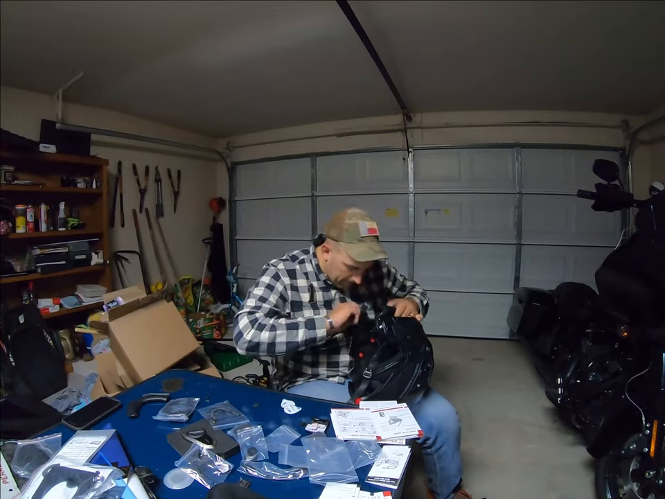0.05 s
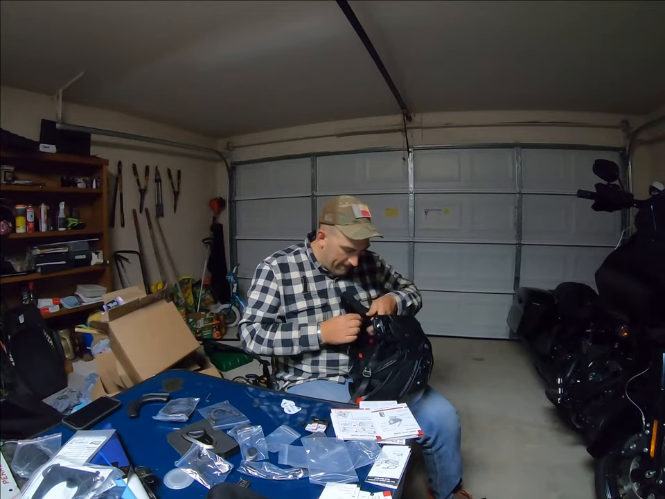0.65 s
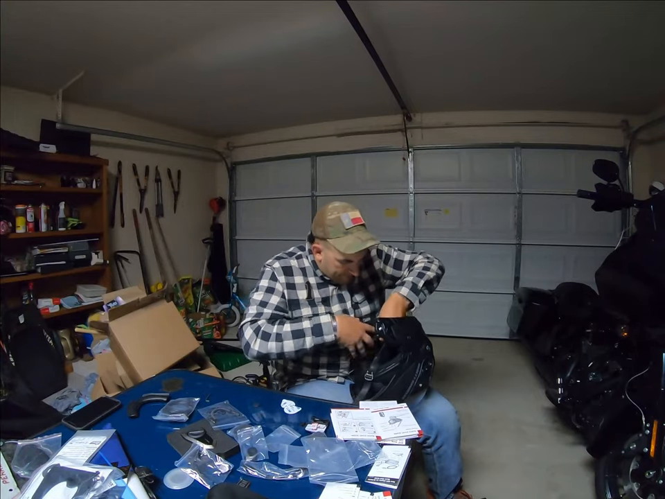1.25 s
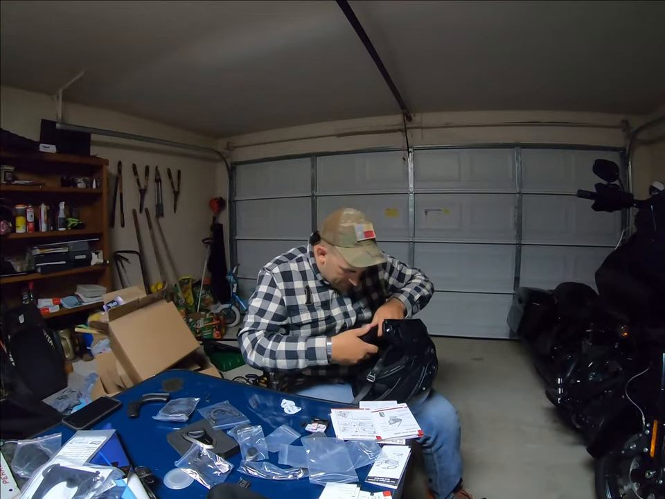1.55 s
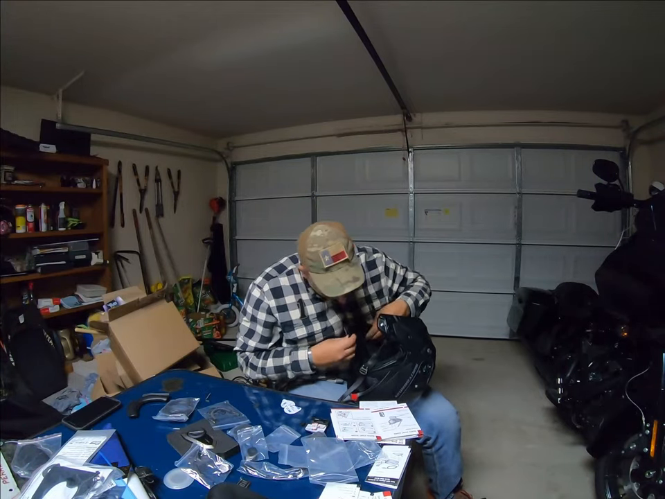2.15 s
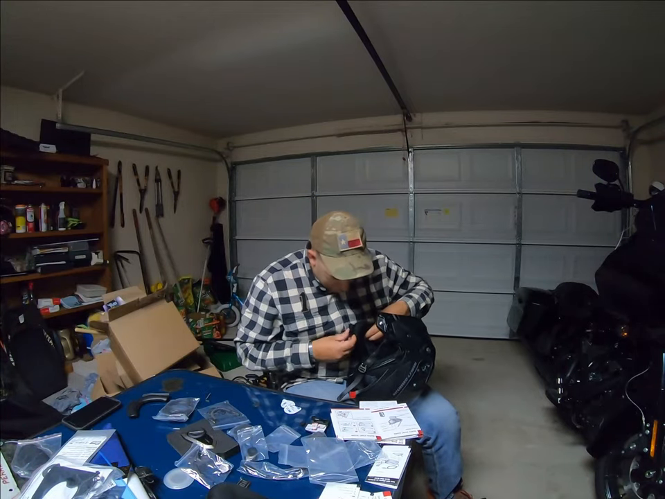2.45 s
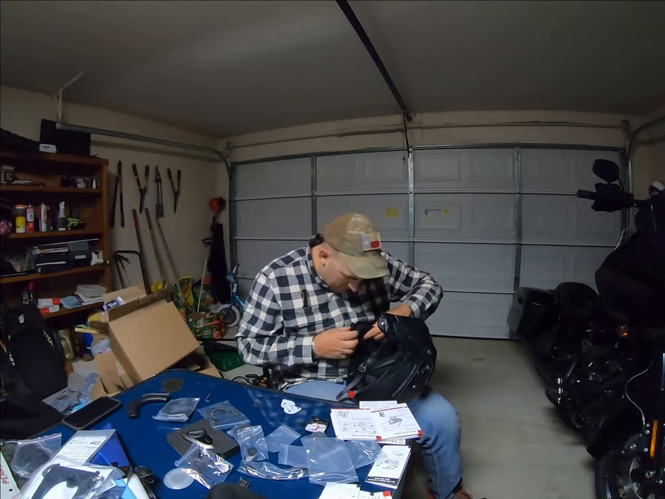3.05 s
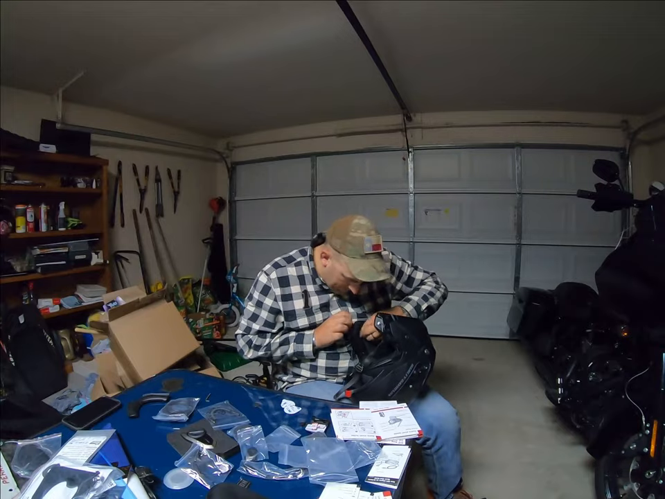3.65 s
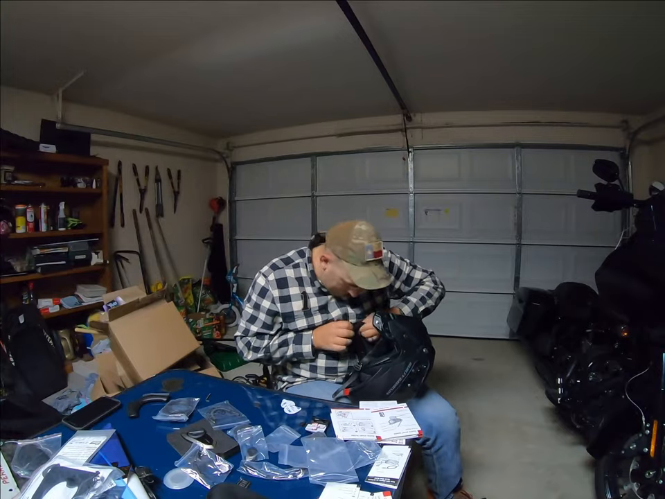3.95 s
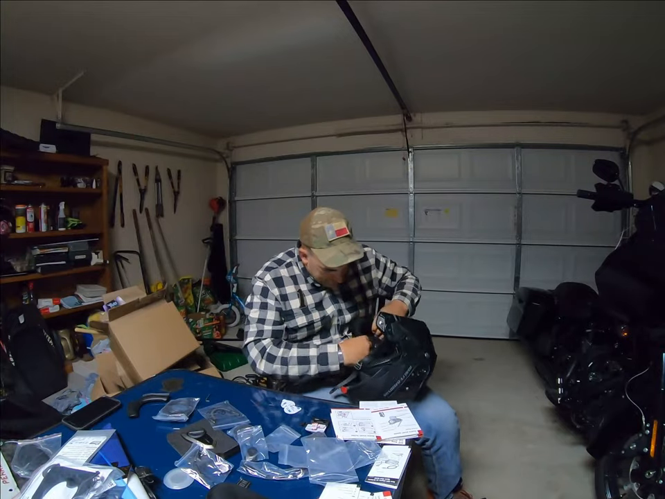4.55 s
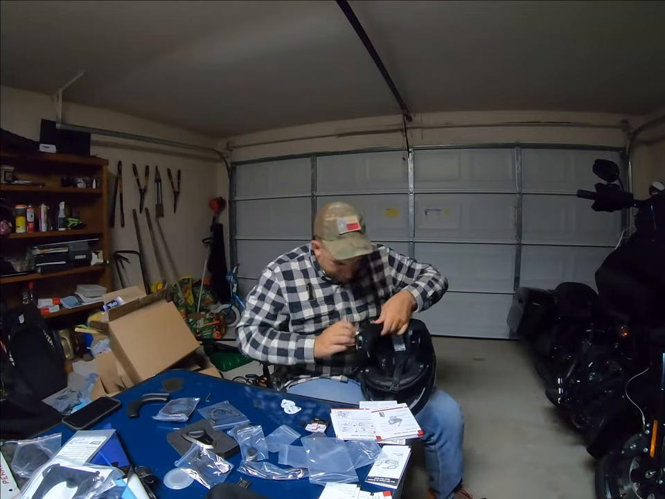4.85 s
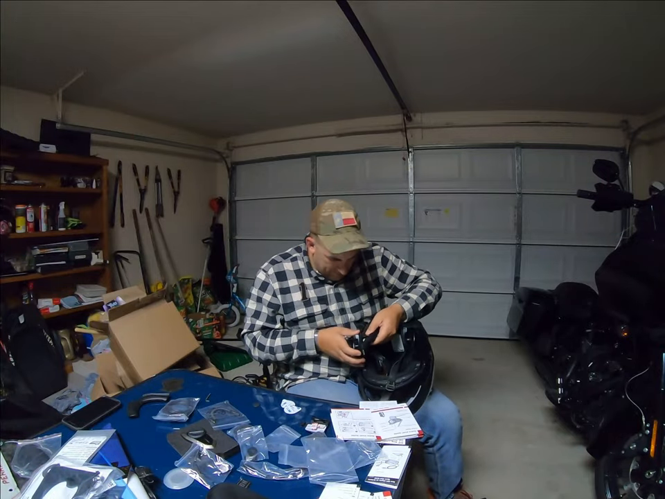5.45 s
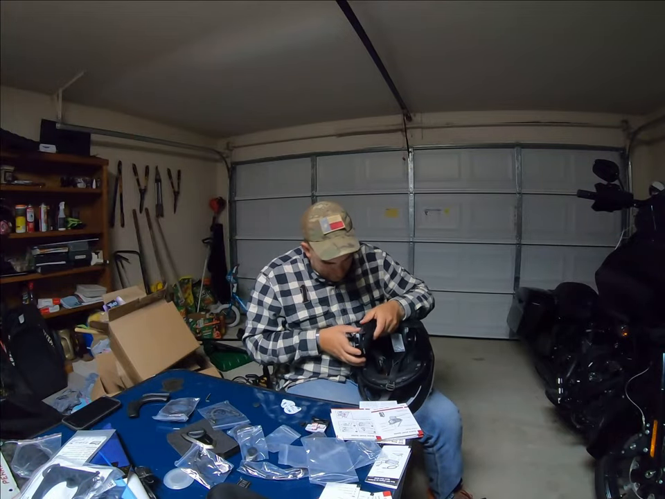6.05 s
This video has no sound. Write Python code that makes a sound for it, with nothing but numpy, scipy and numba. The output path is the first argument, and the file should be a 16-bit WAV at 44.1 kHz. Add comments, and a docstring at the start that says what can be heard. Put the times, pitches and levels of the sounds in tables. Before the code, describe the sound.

Sharp plastic snaps, small ticks and cloth rustle as a pad is pressed into a helmet, over a steady fan hum.

```python
"""Plastic studs snap home and ring a helmet's shell as a pad is pressed in, in a garage.
Each snap is a bright crack, a damped ring and a hollow knock. Around the snaps the pad's backing
ticks, tabs scrape, fingertips tap, the cloth liner rustles and hands bump the padding.
A fan hums steadily behind it all. The stereo camera, about a metre away, ducks its gain
after the loudest snaps."""
import sys
import numpy as np
from scipy import signal
from scipy.fft import rfft, irfft
from scipy.io import wavfile
from scipy.ndimage import uniform_filter1d
from numba import njit

SR = 44100
rng = np.random.default_rng(int(sys.argv[2]) if len(sys.argv) > 2 else 0)


def output_pcm(signal):
    """Save a mono or channel-first signal as 16-bit PCM at the path in sys.argv[1].

    Samples are clipped to [-1, 1] before scaling.
    """
    pcm = np.clip(np.atleast_2d(signal).T, -1, 1) * 32767
    wavfile.write(sys.argv[1], SR, np.round(pcm).astype(np.int16))


N = 277993
TIME = np.arange(N) / SR
HIT_SIZE, HIT_SPAN_S = 8192, .02  # samples in one hit; the span its rms level refers to
HIT_TIME, HIT_SCALE = TIME[:HIT_SIZE], np.sqrt(HIT_SPAN_S * SR / HIT_SIZE)
ROOM_T60_S = 0.11
HOLLOW_HZ, KNOCK_BELOW_HZ = 1770, 1000  # the shell's main note; the split between knock and ring

# The fan's rush of air. Each row: frequency in Hz, relative level in dB.
FAN_AIR_SPECTRUM = [(20, -33), (60, -19), (100, -10), (170, -7), (280, -8), (380, -9), (630, -7), (1100, 3),
                    (1700, -9.5), (2300, -16), (3000, -21.5), (4200, -15), (5300, -24), (15000, -33.5)]
# The fan's humming resonances. Each row: pitch in Hz, bandwidth in Hz, rms level in dB.
FAN_MODES = [(98, 12.7, -66.5), (321, 16, -67.5), (470, 31, -79.5), (729.4, 8.1, -61), (806, 43, -53),
             (844.4, 25.7, -49.5), (942, 12, -92), (967, 16, -58), (1028, 32, -64), (1185, 15, -62),
             (1258, 8.2, -62.5), (1414, 56, -63.5), (1649, 35, -61.5), (1764, 20, -64)]
# Stereo width of the fan and of the room. Each row: frequency in Hz, side over mid in dB.
FAN_STEREO = [(60, -32), (110, -14.5), (200, -18), (380, -19.5), (700, -17), (1290, -12.5), (2380, 5),
              (4400, 3), (8120, 5), (15000, -3)]
ROOM_STEREO = [(200, -3), (1200, -42), (2400, -7), (4400, -1), (8000, -2.5), (13000, -3.5)]
NARROW_STEREO = FAN_STEREO[:5]  # the fan's low bands: almost mono
# Tone of the sound scattered round the room. Each row: frequency in Hz, relative level in dB.
WASH_SPECTRUM = [(300, -1.5), (1200, -9), (2500, 1.5), (4500, -1.5), (9000, -1.5), (16000, -3)]
# Resonances of the padded hollow. Each row: pitch in Hz, bandwidth in Hz, relative level in dB.
PADDING_MODES = [(126, 31, -4.5), (285, 53, 10.5), (433, 44, 3), (517, 40, 5.5), (673, 90, 6.5)]
# A resonance near 830 Hz that each snap sets ringing and, above it, the ring of the panel. Each row: pitch in
# Hz, bandwidth in Hz, relative level in dB.
HIT_MODES = [(238, 32, -17), (524, 83, -6), (830, 38, 2), (1140, 290, -0.5), (1446, 40, -3),
             (1807, 220, -2.5), (1986, 200, -3.5), (2540, 360, -12), (4480, 730, -3.5)]
# Tone of the cloth, the thin backing's tick and a stud's crack.
# Each row: frequency in Hz, relative level in dB.
CLOTH_SPECTRUM = [(300, -4), (900, 0.5), (1900, 11), (2800, 0), (4500, 1.5), (7300, 5.5), (10000, 3.5),
                  (13000, 0.5), (16000, -6)]
TICK_SPECTRUM = [(100, -28), (1200, 1), (3200, -9), (5200, -0.5), (7300, 3.5), (10000, 1.5), (13000, 1.5),
                 (16000, 0)]
CRACK_SPECTRUM = [(30, -19), (100, -7), (220, -8.5), (400, -15), (1200, -10), (2300, -1.5), (3050, -5),
                  (4000, 0), (7000, 2.5), (10000, 3.5), (13500, 5), (16000, 4.5)]
# Dull bumps on the padding, and the low thump of the loudest snap (at 4.341 s).
# Each row: middle in seconds, level in dB before trim, length in seconds, main note in Hz.
DULL_THUMPS = [(0.258, -43.5, .02, 260), (0.417, -43.5, .025, 316), (0.653, -48, .02, 300),
               (0.706, -45.5, .02, 385), (0.939, -45.5, .02, 322), (1.182, -46, .02, 400),
               (1.788, -46, .02, 350), (2.199, -42, .02, 290), (2.348, -44, .025, 332),
               (2.465, -46.5, .02, 320), (2.561, -46.5, .06, 400), (2.607, -41.5, .02, 270),
               (2.643, -50, .015, 310), (2.757, -44, 0.044, 403), (2.859, -42, .05, 335),
               (2.973, -43, .02, 260), (3.031, -47.5, .02, 390), (3.272, -41.5, 0.074, 420),
               (3.311, -41.5, 0.061, 380), (3.389, -43, 0.066, 420), (3.447, -40.5, .01, 320),
               (3.629, -43, .015, 296), (3.8, -47, .02, 280), (3.962, -43.5, .02, 280),
               (4.341, -44, .004, 110), (4.673, -41.5, .03, 280), (5.134, -41, .05, 280),
               (6.182, -43.5, .02, 280), (6.239, -43.5, .02, 510)]
# Spells of kneading the pad. Each row: start and end in seconds, level in dB before trim,
# length of one bump in seconds, main note in Hz.
KNEADING_SPELLS = [(5.43, 5.899, -47, .025, 334)]
# Hand strokes over the liner. Each row: start in seconds, length in seconds, rubbing strength in dB.
LINER_STROKES = [(0, 0.21, -61), (0.21, 0.087, -55.5), (0.486, 0.048, -53.5), (0.742, 0.037, -53.5),
                 (0.864, 0.087, -59), (0.98, 0.22, -54), (1.2, 0.13, -53.5), (1.383, 0.13, -55.5),
                 (1.542, 0.14, -55.5), (1.69, 0.11, -52), (1.817, 0.06, -55.5), (1.877, 0.12, -52),
                 (2.043, .025, -55), (2.152, 0.048, -51), (2.56, 0.064, -77), (2.783, 0.033, -54.5),
                 (2.952, 0.12, -55.5), (3.13, 0.018, -53), (3.215, 0.021, -55), (3.338, 0.18, -52),
                 (3.805, 0.082, -50), (4.06, 0.15, -54.5), (4.18, 0.08, -50.5), (4.388, 0.048, -43.5),
                 (4.487, 0.043, -48.5), (4.541, 0.041, -44.5), (4.59, 0.022, -45), (4.644, 0.061, -48.5),
                 (4.718, 0.039, -47.5), (4.81, 0.18, -52), (4.848, 0.051, -45.5), (5.073, 0.24, -58.5),
                 (5.386, 0.071, -47.5), (5.41, 0.029, -49), (5.676, 0.05, -56), (5.897, 0.068, -54.5)]
# The backing's clearest ticks.
# Each row: start in seconds, crack and ring levels in dB before trim, treble edge in Hz.
BACKING_TICKS = [(0.129, -52.5, -58, 14200), (0.238, -49, -55.5, 14000), (0.285, -44.5, -64, 14000),
                 (0.332, -55.5, -56, 7500), (0.513, -53, -48.5, 12000), (0.528, -50.5, -53.5, 12000),
                 (0.714, -48, -52.5, 8000), (0.783, -51, -53.5, 7500), (0.85, -41.5, -49.5, 17000),
                 (1.025, -45, -59, 9000), (1.125, -42, -45.5, 12000), (1.185, -45, -55, 14000),
                 (1.242, -58, -52, 9000), (1.309, -55, -52, 10000), (1.372, -41, -39, 16000),
                 (1.431, -48, -55, 14000), (1.597, -48, -52, 7500), (1.635, -45, -72, 14000),
                 (1.66, -56, -73, 14000), (1.72, -46, -67, 18000), (1.7707, -53, -51, 12000),
                 (1.887, -47.5, -69, 14000), (2.229, -46, -76, 14000), (2.372, -46, -73, 14000),
                 (2.463, -43.5, -78, 14000), (2.472, -63, -76, 14000), (3.152, -54, -66, 12000),
                 (3.18, -51, -60, 14000), (3.372, -47.5, -60, 14000), (3.403, -56, -59, 14000),
                 (3.431, -53, -60, 14000), (3.513, -54, -57, 9000), (3.575, -47.5, -58.5, 10600),
                 (3.733, -54, -61, 14000), (3.7556, -38.5, -61, 18000), (3.822, -45.5, -64, 16000),
                 (3.875, -53, -64, 14000), (4.019, -56, -74, 14000), (4.065, -54, -57, 8000),
                 (4.081, -59, -64, 14000), (4.236, -51, -53, 12000), (4.255, -43, -55, 14000),
                 (4.282, -43, -74, 14000), (4.613, -41, -70, 14000), (4.672, -51, -69, 14000),
                 (4.699, -51, -66, 14100), (4.748, -43.5, -62, 14000), (4.798, -49, -76, 14000),
                 (4.944, -49.5, -70, 12000), (5.071, -48, -76, 14000), (5.116, -54, -73, 14000),
                 (5.168, -51, -58, 12000), (5.318, -55, -57, 12000), (5.363, -48.5, -58, 14000),
                 (5.401, -47, -68, 16000), (5.722, -48.5, -53, 10000), (5.817, -49.5, -72, 11000),
                 (5.827, -48.5, -64, 7000), (5.856, -49, -70, 15000), (6.236, -48.5, -57, 14000)]
# Fingertips on a panel. Each row: start in seconds, note level in dB, note in Hz, crack level in dB.
FINGER_TAPS = [(1.2095, -38, 1770, -58), (1.273, -46, 1870, -57), (5.450, -39, 1960, -45)]
# Tabs sliding along the shell. Each row: middle and length in seconds, the whole run's crack and
# ring levels in dB, treble edge in Hz, focus on the hollow note in dB per octave.
TAB_SCRAPES = [(3.29, 0.014, -43.5, -46, 11000, 13), (3.762, 0.015, -45, -49, 15000, 13),
               (4.1515, 0.008, -31, -36.5, 13800, -6), (4.177, 0.0087, -34, -41, 14000, -2),
               (4.328, 0.0061, -44.5, -56, 9000, 6), (5.922, .006, -41, -48, 16000, 17),
               (5.935, .008, -50, -49, 16000, 14)]
# Studs snapping home. Each row: start in seconds, crack level in dB before trim, ring level in dB,
# treble edge in Hz, room send in dB, focus on the hollow note in dB per octave, knock level in dB,
# tab resonance in Hz.
STUD_SNAPS = [(0.6039, -29.5, -32, 10900, -9.5, 3, -46, 4800),
              (1.0353, -39, -34, 8650, -7.5, 11, -42, 7200),
              (1.0855, -28.3, -32.5, 9200, -5, 12, -38.5, 5300),
              (1.368, -33.5, -31, 4150, -16, 14, -40.5, 2600),
              (2.161, -47.5, -40.5, 5430, -11, 12, -60, 3000), (4.3403, -18, -32, 32000, -4, -2, -38, 4070)]


def undb(db):
    """Decibels to gain."""
    return 10 ** (np.asarray(db) / 20)


def unit(x):
    """Scale to rms 1."""
    return x / np.sqrt(np.mean(x ** 2))


def gains(spectrum, size):
    """A (Hz, dB) spectrum as gains on the bins of a transform."""
    hz, db = np.transpose(spectrum)
    return undb(np.interp(np.log(np.fft.rfftfreq(size, 1 / SR) + 1), np.log(hz), db))


def colour(x, spectrum):
    """Equalise by a (Hz, dB) spectrum."""
    return irfft(rfft(x) * gains(spectrum, x.shape[-1]), x.shape[-1])


def diffuse(size, width):
    """Stereo noise whose side signal follows a width curve."""
    mid, side = rng.standard_normal((2, size))
    side = colour(side, width)
    return unit(np.array([mid + side, mid - side]))


def wander(turns_per_s):
    """Smooth random drift with rms 1."""
    hold = int(SR / turns_per_s)
    steps = np.repeat(rng.standard_normal(N // hold + 1), hold)
    return unit(uniform_filter1d(steps, hold)[:N])


def add(out, s, sound):
    """Mix a sound in at s seconds."""
    start = max(int(s * SR), 0)
    out[:, start:start + sound.shape[-1]] += sound[:, :max(N - start, 0)]


def resonate(noise, modes):
    """Pass noise through a bank of resonances."""
    bins = np.fft.rfftfreq(noise.shape[-1], 1 / SR)
    power = sum((undb(db) * unit(1 / (1 + ((bins - hz) / width) ** 2))) ** 2 for hz, width, db in modes)
    return irfft(rfft(noise) * np.sqrt(power), noise.shape[-1])


def ringing(modes, focus_db=0, note_hz=HOLLOW_HZ):
    """Struck modes, those near one note favoured by the focus; each hit rings a little differently."""
    detunes = 1 + 0.017 * rng.standard_normal(len(modes))
    signs = rng.choice([-1, 1], len(modes))
    ring = 0
    for (hz, width, db), detune, sign in zip(modes, detunes, signs):
        strength = undb(db - focus_db * abs(np.log2(hz / note_hz))) * np.sqrt(width)
        decay = np.exp(-np.pi * width * HIT_TIME)
        ring += sign * strength * decay * np.cos(2 * np.pi * hz * detune * HIT_TIME)
    return unit(ring)


def fan(air_db=-48.5, waver_db=1.5):
    """The bed: moving air, and the narrow resonances that it keeps humming."""
    hum = resonate(diffuse(N, NARROW_STEREO), FAN_MODES)
    air = unit(colour(diffuse(N, FAN_STEREO), FAN_AIR_SPECTRUM)) * undb(air_db)
    return hum * undb(waver_db * wander(14)) + air


def garage(sound, send_db, wash_db=11, echo_db=7, build_s=0.0019, echoes=16):
    """Direct sound, early echoes off helmet and table, and the short wash of a cluttered room."""
    wash = colour(diffuse(HIT_SIZE, ROOM_STEREO), WASH_SPECTRUM)
    wash *= 1 - np.exp(-HIT_TIME / build_s)
    wash *= np.exp(-np.log(1000) * HIT_TIME / ROOM_T60_S)
    response = unit(wash) * undb(wash_db) / np.sqrt(HIT_SIZE)
    lags = (rng.uniform(.0008, .017, echoes) * SR).astype(int)
    skews = rng.integers(-1, 2, echoes)  # samples between left and right
    for lag, skew, sign in zip(lags, skews, rng.choice([-1, 1], echoes)):
        response[[0, 1], [lag, lag + skew]] += sign * undb(echo_db) / np.sqrt(echoes)
    response *= undb(send_db)  # a spot that faces the camera sounds drier
    response[:, 0] += 1  # the direct sound
    return signal.fftconvolve(sound[None], unit(response) / np.sqrt(HIT_SIZE), axes=1)


def slips(length_s, count=30):
    """A run of tiny slips, thickest in the middle, with energy 1."""
    force = np.zeros(int(length_s * SR) + 2)
    places = rng.triangular(0, .5, 1, count)
    force[(places * length_s * SR).astype(int)] = rng.standard_normal(count)
    return force / np.linalg.norm(force)


def thump(length_s, note_hz, focus_db=12, side_db=-19):
    """A dull thump: a short run of slips rings the padded hollow round one note."""
    def thud():
        ring = ringing(PADDING_MODES, focus_db, note_hz)
        return unit(signal.fftconvolve(ring, slips(length_s))[:HIT_SIZE])

    mid, side = thud(), undb(side_db) * thud()
    return np.array([mid + side, mid - side]) * HIT_SCALE


def kneading(gap_s=.08, looseness=.3):
    """Cues for the soft bumps of kneading, at a loose pace."""
    return [(s + looseness * gap_s * rng.uniform(-1, 1), db, length_s, note_hz)
            for start, end, db, length_s, note_hz in KNEADING_SPELLS
            for s in np.arange(start, end, gap_s)]


def padding(push_db=-64, uneven_db=6, thump_trim_db=-0.5):
    """Hands shift unevenly on the foam, with dull bumps; the loudest snap gets its low thump too."""
    push = diffuse(N, NARROW_STEREO) * undb(uneven_db * np.tanh(wander(45)))
    out = resonate(unit(push) * undb(push_db), PADDING_MODES)
    for s, db, length_s, note_hz in DULL_THUMPS + kneading():
        add(out, s - length_s / 2, thump(length_s, note_hz) * undb(db + thump_trim_db))
    return out


def rubbing(grip_db=-68, attack_s=0.012, release_s=0.017):
    """Strength of the rubbing: strokes swell, hold and die away over the fingers' light grip."""
    power = undb(grip_db) ** 2
    for s, length_s, db in LINER_STROKES:
        swell = np.clip((TIME - s) / attack_s, 0, 1)
        fade = np.exp(-np.maximum(TIME - s - length_s, 0) / release_s)
        power = power + (undb(db) * swell * fade) ** 2
    return np.sqrt(power)


def rustle(rub, trim_db=2, grains_per_s=550, spread_db=2.5, grain_s=0.0029, smear=0.6, shift_db=2):
    """Cloth fibres catch and let go in grains, smeared by the room; their brightness drifts at random."""
    sizes = undb(spread_db * np.minimum(rng.exponential(size=N), 4))
    grain_energy = (rng.random(N) < grains_per_s / SR) * sizes ** 2
    near = np.exp(-HIT_TIME / grain_s)
    room = np.exp(-2 * np.log(1000) * HIT_TIME / ROOM_T60_S)
    grain_shape = near / near.sum() + smear * room / room.sum()
    power = np.abs(signal.fftconvolve(grain_energy, grain_shape)[:N])
    cloth = colour(diffuse(N, ROOM_STEREO), CLOTH_SPECTRUM)
    dull = signal.sosfilt(signal.butter(1, 6000, fs=SR, output="sos"), cloth)
    bright = cloth - dull
    cloth = dull * undb(shift_db * wander(15)) + bright * undb(shift_db * wander(19))
    return unit(cloth * np.sqrt(power)) * rub * undb(trim_db)


def impulse(spectrum):
    """The sharpest causal pulse with the given spectrum (minimum phase)."""
    cepstrum = irfft(np.log(gains(spectrum, HIT_SIZE)))
    cepstrum[1:HIT_SIZE // 2] *= 2
    cepstrum[HIT_SIZE // 2 + 1:] = 0
    return irfft(np.exp(rfft(cepstrum)))


def chatter(crack, longest_trip_s=.0002, returned=0.31, paths=4):
    """The crack runs to and fro inside the plastic: a tiny burst with the same spectrum."""
    for share in (np.arange(paths) + rng.random(paths)) / paths:
        loop = np.r_[1, np.zeros(int(share * longest_trip_s * SR)), returned * rng.choice([-1, 1])]
        crack = signal.lfilter(loop[::-1], loop, crack)  # all-pass
    return crack


def plastic(spectrum, crack_db, ring_db, edge_hz=14000, focus_db=0, knock_db=None):
    """Stressed plastic lets go: a bright crack, the panel's ring and, for a snap, a resonance near 830 Hz."""
    hz, db = np.transpose(spectrum)
    treble_loss_db = 10 * np.log10(1 + (hz / edge_hz) ** 4)  # softer contact, less treble
    crack = unit(chatter(impulse(np.transpose([hz, db - treble_loss_db]))))
    ring = ringing([mode for mode in HIT_MODES if mode[0] > KNOCK_BELOW_HZ], focus_db)
    sound = undb(crack_db) * crack + undb(ring_db) * ring
    if knock_db is not None:
        sound += undb(knock_db) * ringing([mode for mode in HIT_MODES if mode[0] <= KNOCK_BELOW_HZ])
    return sound * HIT_SCALE


def crackles(rub, longest_gap_s=.06, spread_db=2, count=200):
    """The backing gives way in faint random ticks, louder the harder the liner is rubbed."""
    out = np.zeros((2, N))
    starts = np.cumsum(rng.uniform(0, longest_gap_s, count))
    for s, size in zip(starts, rng.standard_normal(count)):
        if s < TIME[-1]:
            strength = rub[int(s * SR)] * undb(spread_db * size)
            tick = plastic(TICK_SPECTRUM, crack_db=-9.5, ring_db=-26)
            add(out, s, strength * garage(tick, send_db=-9))
    return out


def ticks(crack_trim_db=-2, ring_trim_db=6):
    """The pad's thin plastic backing ticks and rings the shell."""
    out = np.zeros((2, N))
    for s, crack_db, ring_db, edge_hz in BACKING_TICKS:
        tick = plastic(TICK_SPECTRUM, crack_db + crack_trim_db, ring_db + ring_trim_db, edge_hz)
        add(out, s, garage(tick, send_db=-10))
    return out


def taps(note_width_hz=120, shell_under_note_db=7):
    """A fingertip's small crack and the panel's hollow note, over a trace of the rest of the shell."""
    out = np.zeros((2, N))
    decay = np.exp(-np.pi * note_width_hz * HIT_TIME)
    for s, note_db, note_hz, crack_db in FINGER_TAPS:
        note = unit(decay * np.sin(2 * np.pi * note_hz * HIT_TIME)) * HIT_SCALE
        contact = plastic(CRACK_SPECTRUM, crack_db, note_db - shell_under_note_db, edge_hz=8000)
        add(out, s, garage(undb(note_db) * note + contact, send_db=-13))
    return out


def scrapes(releases=9):
    """Tabs slide along the shell in a quick run of separate releases."""
    out = np.zeros((2, N))
    for s, length_s, crack_db, ring_db, edge_hz, focus_db in TAB_SCRAPES:
        for lag in length_s * rng.triangular(-.5, 0, .5, releases):
            slip = plastic(CRACK_SPECTRUM, crack_db, ring_db, edge_hz, focus_db)
            add(out, s + lag, garage(slip, send_db=-8) / np.sqrt(releases))
    return out


def stud_spectrum(tab_hz, lift_db=5, width_octaves=0.59):
    """The crack's tone, lifted round the broad resonance of the tab that carries the stud."""
    hz = np.geomspace(30, 20000, 120)
    crack_hz, crack_db = np.transpose(CRACK_SPECTRUM)
    bell_db = lift_db * np.exp(-(np.log2(hz / tab_hz) / width_octaves) ** 2)
    return np.transpose([hz, np.interp(np.log(hz), np.log(crack_hz), crack_db) + bell_db])


def snaps(crack_trim_db=0.5):
    """Studs snap home: each cracks, rings the panel and sets a resonance near 830 Hz ringing."""
    out = np.zeros((2, N))
    for s, crack_db, ring_db, edge_hz, send_db, focus_db, knock_db, tab_hz in STUD_SNAPS:
        spectrum = stud_spectrum(tab_hz)
        snap = plastic(spectrum, crack_db + crack_trim_db, ring_db, edge_hz, focus_db, knock_db)
        add(out, s, garage(snap, send_db))
    return out


def scene(right_over_left_db=0.9):
    """Helmet and fan, both a little to the right."""
    rub = rubbing()
    mix = snaps() + ticks() + scrapes() + taps() + rustle(rub) + fan() + padding() + crackles(rub)
    return mix * undb([[-right_over_left_db / 2], [right_over_left_db / 2]])


@njit
def follow(x, attack_s, release_s):
    """Envelope follower with separate times for rising and sinking."""
    out, level = np.empty(len(x)), 0.
    for i in range(len(x)):
        level += (x[i] - level) / (SR * (attack_s if x[i] > level else release_s))
        out[i] = level
    return out


def record(dry, threshold_db=-31, attack_s=0.018, release_s=0.16, react_s=0.1, ceiling=.9, top_hz=16100):
    """The gain ducks just after a loud snap and creeps back; peaks are rounded, the top is cut."""
    envelope = follow(np.abs(dry).max(axis=0), attack_s, release_s)
    excess = np.log(np.maximum(envelope / undb(threshold_db), 1))
    gain = np.exp(-follow(excess, react_s, react_s))
    rounded = ceiling * np.tanh(dry * gain / ceiling)
    return signal.sosfilt(signal.ellip(8, .2, 70, top_hz, fs=SR, output="sos"), rounded)


dry = scene()
out = record(dry)
output_pcm(out)
```